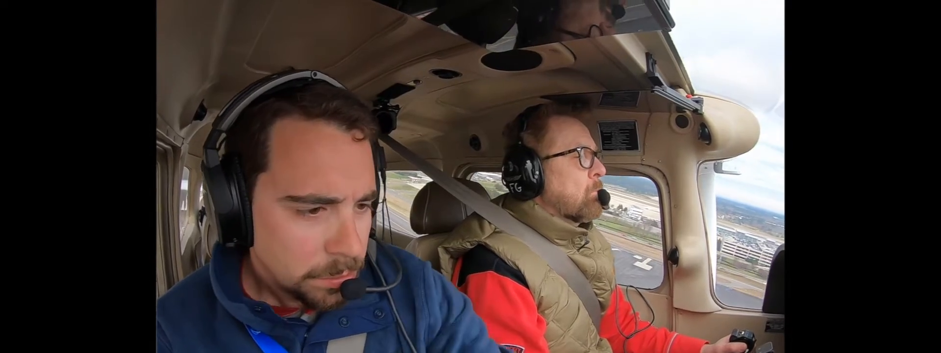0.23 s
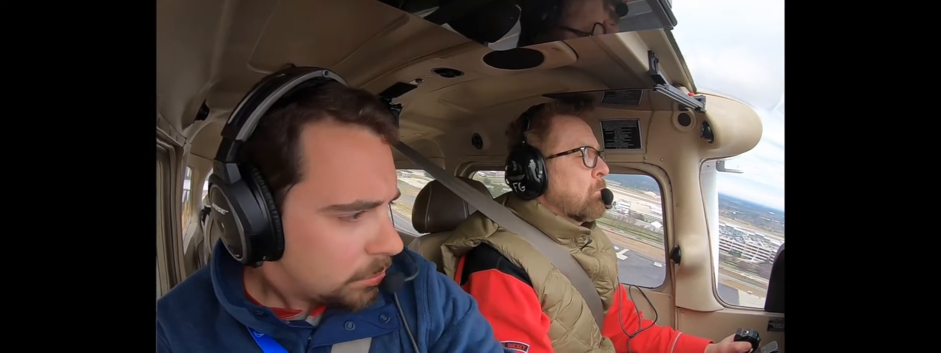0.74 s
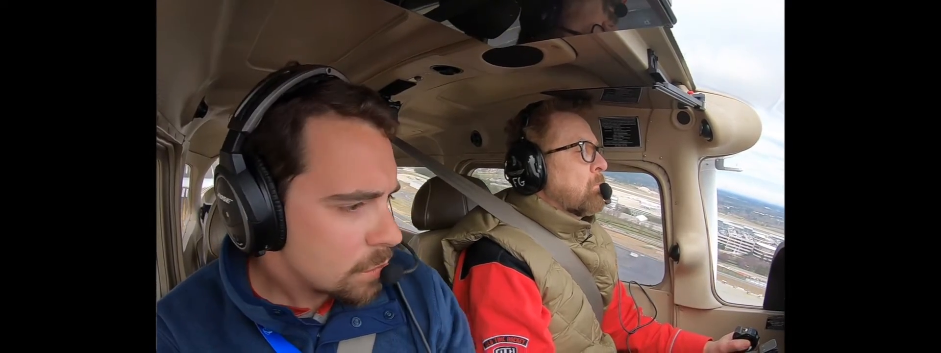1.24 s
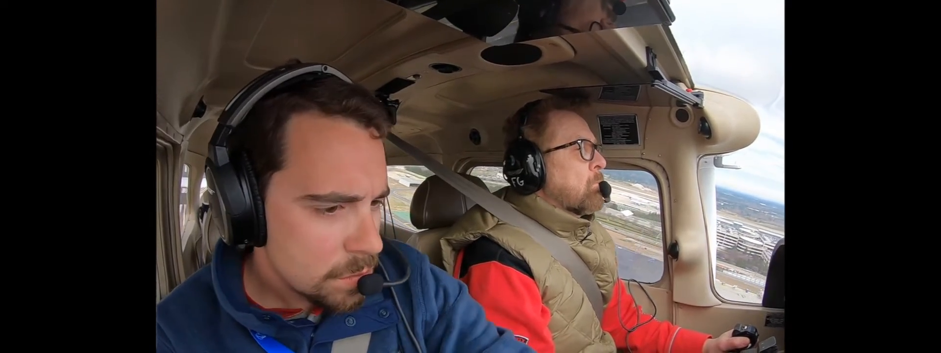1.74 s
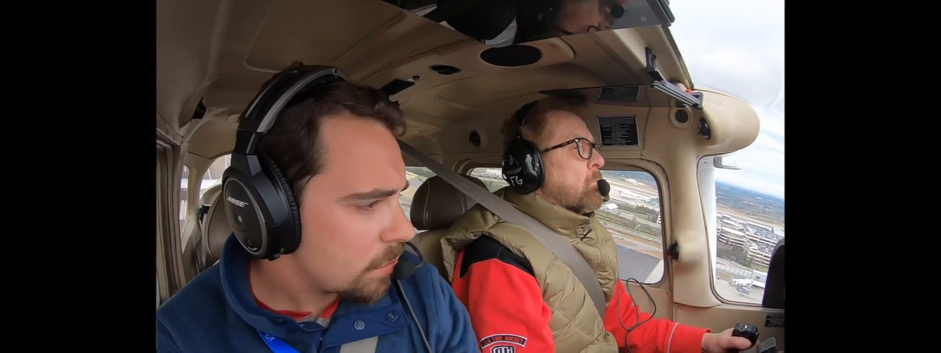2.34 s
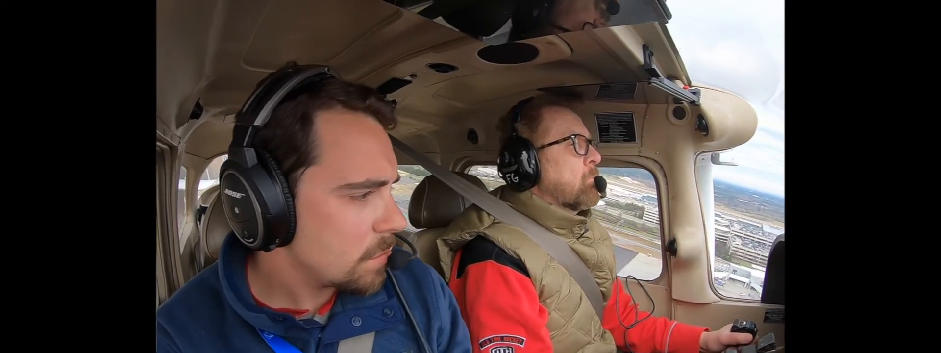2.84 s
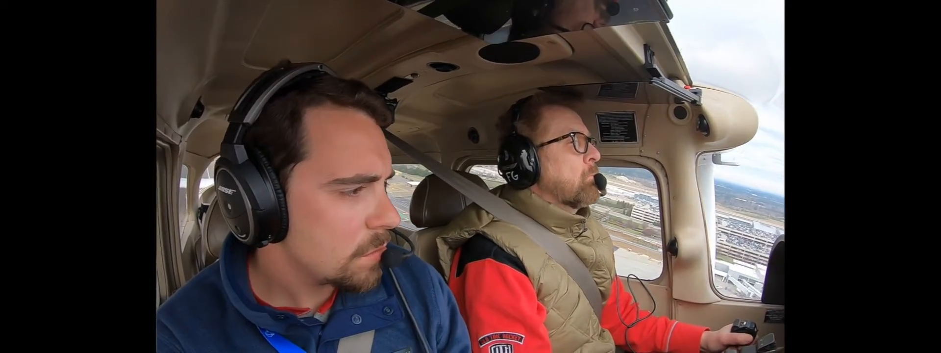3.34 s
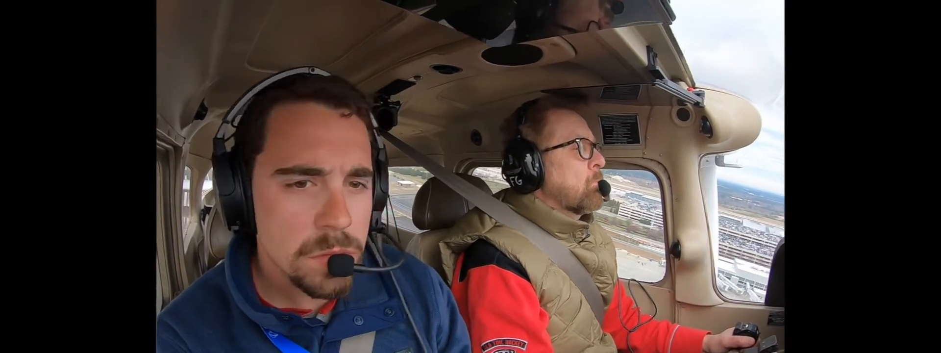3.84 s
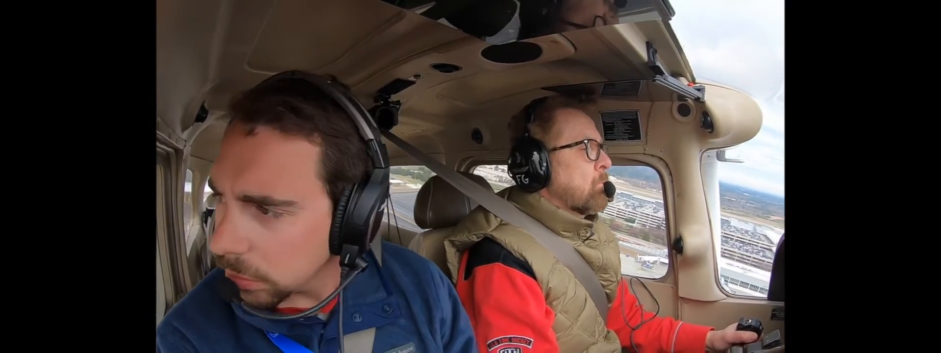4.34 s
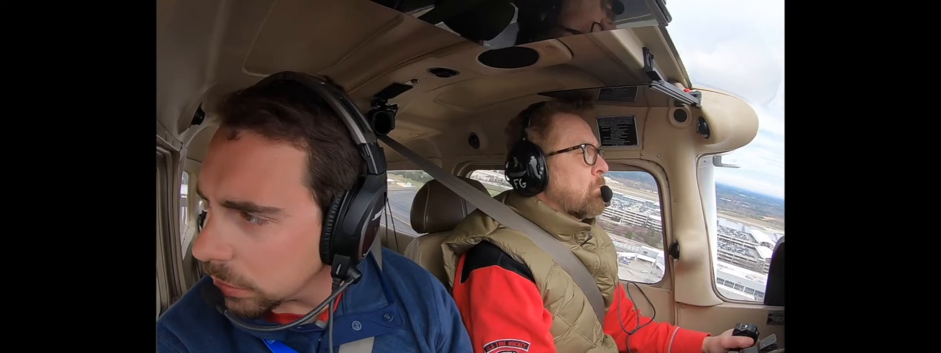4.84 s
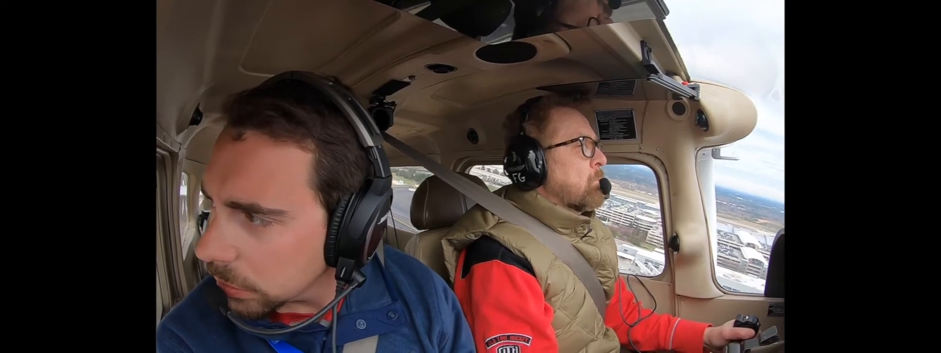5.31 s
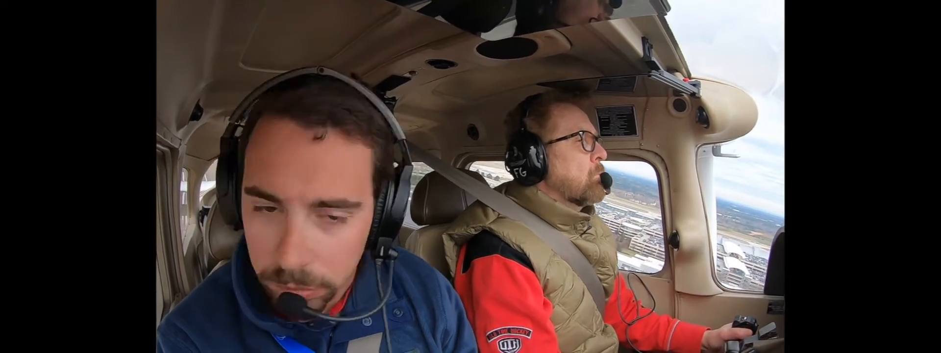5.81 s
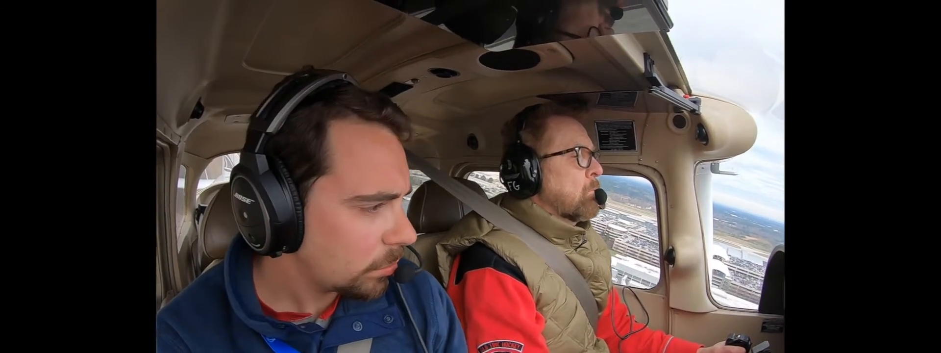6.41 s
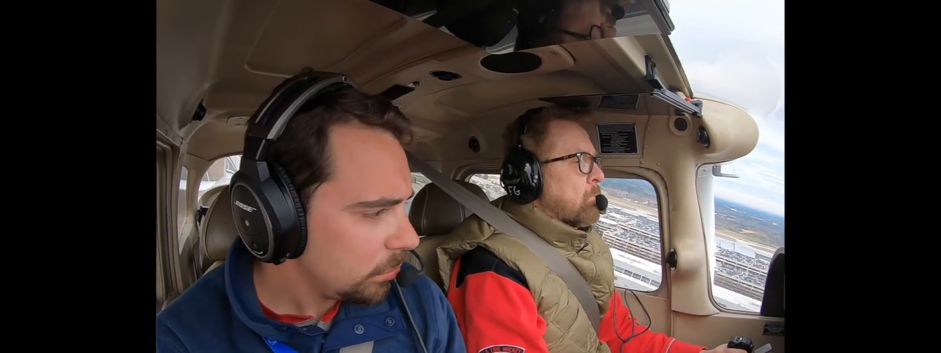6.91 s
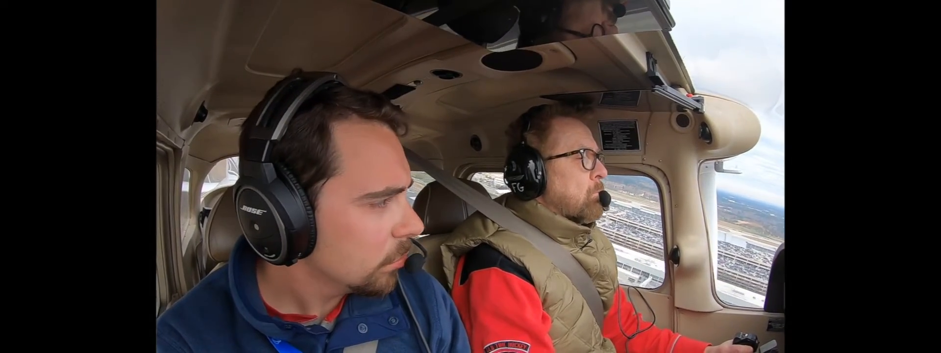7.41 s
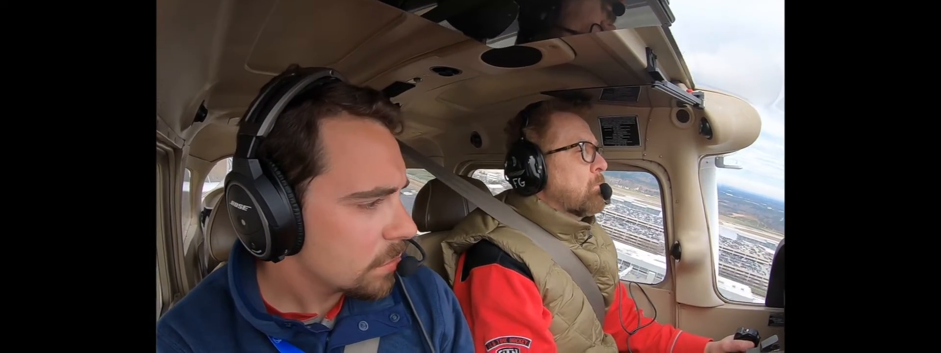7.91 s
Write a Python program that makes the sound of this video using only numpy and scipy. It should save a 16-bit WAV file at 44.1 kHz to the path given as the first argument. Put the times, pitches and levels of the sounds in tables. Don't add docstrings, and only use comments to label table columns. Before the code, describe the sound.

Constant low piston-engine and propeller drone in a light aircraft cabin, muffled at first, one sharp knock, later a run of soft thuds.

```python
import sys
import numpy as np
from scipy import signal
from scipy.io import wavfile
from scipy.ndimage import uniform_filter1d

SR = 44100
rng = np.random.default_rng(int(sys.argv[2]) if len(sys.argv) > 2 else 0)


def inscribe(sig):
    pcm = np.round(np.clip(np.atleast_2d(sig).T, -1, 1) * 32767)
    wavfile.write(sys.argv[1], SR, pcm.astype(np.int16))


def volts_from_decibels(level):
    exponent = np.asarray(level, float) / 20
    return 10 ** exponent


N = 359805

# (time [s], rate [Hz])
FIRING_RATE = [(0.0, 82.31), (0.6, 82.31), (2.0, 82.64), (3.6, 82.52), (4.4, 82.54), (4.8, 82.65),
               (5.2, 82.59), (6.5, 82.24), (7.2, 82.35), (8.16, 82.41)]
# (time [s], nose-up [-2..2])
NOSE_UP = [(0.0, -2), (0.8, -1.45), (1.0, 0.58), (1.2, 1.2), (1.9, 0.7), (2.6, 1.53), (3.2, -0.63),
           (3.5, 0.95), (3.8, 0.9), (4.2, 0), (4.5, 1.4), (5.5, -0.2), (5.6, -1.7), (6.3, -0.6),
           (6.5, -1.65), (7.2, -0.4), (7.8, 0.66), (8.16, 0.93)]
# (time [s], stereo share [0-1])
OPENING = [
    (0, 0.04),
    (.5, 0.1),
    (1, 0.18),
    (1.5, 0.4),
    (2, 0.68),
    (2.3, 0.91),
    (8.16, 1),
]
# (frequency [Hz], level [dB per Hz])
PORT_DIFFERENCE = [(20, -88), (80, -75), (180, -60), (300, -70), (500, -72), (750, -65), (3200, -81.5),
                   (3750, -86), (3900, -130), (5550, -130), (5700, -87), (8000, -84), (12000, -85.5),
                   (15500, -91)]
WHINE_RATIO = 9.817


def read(points, hz):
    f, value = np.transpose(points)
    return np.interp(np.log(hz + 1), np.log(f + 1), value)


def curves(rows, t):
    s, *columns = np.transpose(rows)
    return np.array([np.interp(t, s, column) for column in columns])


def evened(x):
    return x / np.sqrt(np.mean(x ** 2) + 1e-20)


def waver(t, top_hz):
    knots = np.arange(0, N + 512, 512) / SR
    hz = np.geomspace(.1, top_hz, 24)[:, None]
    sines = np.sin(2 * np.pi * (hz * knots + rng.random((24, 1))))
    slow = (sines / hz ** 0.17).sum(0)
    return np.interp(t, knots, evened(slow))


def tone(turns, db, lead=0.98):
    return np.sqrt(2) * volts_from_decibels(db) * np.cos(2 * np.pi * turns + lead)


def engine(turns):
    # (level [dB rms], per nose-up [1], per sideslip [1], per bank [1])
    multiples = [(-15, -0.073, 0.046, 0.048), (-21.5, 0.22, -0.13, 0.011), (-23.5, -0.37, 0.11, -0.11),
                 (-29.5, 0.34, -0.046, -0.063), (-24.5, 0.4, 0.26, -0.0095), (-36, 0.041, -0.054, -0.29),
                 (-41.4, -0.46, 0.001, 0.1), (-34, -0.14, -0.037, 0.19), (-41, -0.033, 0.098, 0.17),
                 (-39, -0.071, 0.05, 0.16), (-52.5, 0.021, -0.04, 0.26), (-51.5, 0.37, 0.151, -0.149),
                 (-51.5, -0.092, 0.062, 0.025), (-60, -0.12, 0.0046, -0.059), (-48, 0.17, -0.014, 0.075)]
    # (multiple of firing rate [1], level [dB rms])
    uneven = [(0.5, -37), (1.25, -39), (1.5, -38), (1.75, -36), (2.25, -39), (2.75, -42), (3.25, -44),
              (4.25, -48), (4.5, -44), (4.75, -45), (5.5, -39), (5.75, -45), (6.25, -45), (6.75, -45),
              (7.25, -49), (7.75, -57), (8.25, -51), (8.5, -51), (8.75, -51), (9.25, -46), (9.5, -51),
              (9.75, -46), (10.5, -56), (10.75, -55), (11.25, -54), (11.5, -51), (12.25, -56)]
    # (time [s], sideslip [-3..3])
    sideslip = [(0.0, 0.2), (0.7, -0.1), (1.5, 1.25), (1.7, -0.3), (2.0, 0.9), (2.3, -1.8), (2.9, 2.1),
                (3.5, 1.7), (4.4, -2.68), (5.4, 0.6), (5.6, -1.05), (6.5, 0.7), (7.3, -0.59), (8.16, 1.83)]
    # (time [s], bank [-3..3])
    bank = [(0.0, -1.3), (1.0, -0.2), (1.2, -2.5), (1.4, 1.9), (2.3, -0.94), (4.1, 0.8), (4.6, -1.5),
            (5.1, 2.3), (5.8, -0.97), (6.1, 1), (6.6, -1.04), (7.1, 3), (7.6, -0.5), (8.16, -0.7)]
    step = 8
    turns = turns[::step]
    t = np.arange(len(turns)) * step / SR
    attitude = np.vstack([curves(c, t) for c in (NOSE_UP, sideslip, bank)])
    drone = 0
    for k, (db, *gained) in enumerate(multiples, start=1):
        sign = -1 if k % 5 == 0 else 1
        drift = 0.0063 * k * waver(t, top_hz=20)
        flutter_db = 0.17 * k * waver(t, top_hz=27.87)
        share = np.maximum(1 + gained @ attitude, .08)
        drone += sign * share * tone(k * turns + drift, db + flutter_db)
    for k, db in uneven:
        waver_db = 2.0 * waver(t, top_hz=5)
        drone += tone(k * turns + rng.random(), db - 1.2 + waver_db)
    return signal.resample_poly(drone, step, 1)[:N]


def alternator(t, turns, opening):
    # (frequency [Hz], level [dB rms])
    whine = [(800, -42.5), (1620, -50), (2430, -56.5), (3240, -59), (4050, -56.5), (4900, -75), (6500, -63),
             (7300, -68), (8900, -60.5), (10500, -63), (11300, -63), (13000, -66), (15400, -79)]
    centre, wide = 0, 0
    for k in range(1, 20):
        hz = k * WHINE_RATIO * FIRING_RATE[0][1]
        db = read(whine, hz) + 1.6 * waver(t, top_hz=3)
        line = tone(k * WHINE_RATIO * turns + rng.random(), db)
        centre += line * unmuffled(hz, opening) ** 3.5
        differs = read(PORT_DIFFERENCE, hz) > -110
        wide += line * rng.uniform(-1, 1) * differs * min(k / 3, 1)
    return centre + np.outer([1, -1], 0.33 * opening * wide)


def unmuffled(hz, opening):
    # (frequency [Hz], gain [dB])
    muffle = [(500, 0.5), (1000, -1), (2000, -2), (3200, -6.5), (4600, -0.5), (6700, -4.5), (9500, -15),
              (13000, -10.5)]
    return opening + (1 - opening) * volts_from_decibels(read(muffle, hz))


def airflow():
    # (frequency [Hz], level [dB per Hz])
    boom_spectrum = [(12, -69), (28, -57), (40, -43.5), (62, -47.5), (110, -46), (200, -48), (290, -47),
                     (430, -52), (520, -51.5), (600, -60), (800, -59), (1150, -62.5), (1700, -76.5),
                     (4000, -130)]
    # (frequency [Hz], level [dB per Hz])
    hiss_spectrum = [(900, -106), (1600, -65), (2000, -69.5), (2450, -70), (2800, -75), (3750, -78),
                     (4400, -68.5), (5500, -71.5), (6600, -79), (7900, -80.5), (10000, -78.5),
                     (11500, -82.5), (13000, -84)]
    # (frequency [Hz], gain [dB])
    capsule = [(13000, 0), (15700, -6)]
    frames = N // 512 + 5
    hz = np.fft.rfftfreq(2048, 1 / SR)[:, None]
    t = np.arange(frames) * 512 / SR
    a, b, c, d, patches = rng.standard_normal((frames, 1025, 5)).T
    patches = uniform_filter1d(patches, size=14, axis=0)
    patches = evened(uniform_filter1d(patches, size=10, axis=1))
    opening = curves(OPENING, t)[0]
    buffet_db, swell_db, hiss_db = gusts(t)
    low = 1 / (1 + (hz / 60) ** 4)
    boom = volts_from_decibels(read(boom_spectrum, hz) + low * buffet_db + (0.5 - low) * swell_db)
    hiss = volts_from_decibels(read(hiss_spectrum, hz) + 0.53 * hiss_db + read(capsule, hz))
    centre = np.hypot(boom, hiss) * unmuffled(hz, opening) * (a + 1j * b)
    wide = volts_from_decibels(read(PORT_DIFFERENCE, hz)) * opening * (c + 1j * d)
    per_hz = np.sqrt(SR / 2048 * 2)
    z = np.array([centre + wide, centre - wide]) * volts_from_decibels(0.39 * patches) * per_hz / 2
    return signal.istft(z, nperseg=2048, noverlap=1536)[1][:, :N]


def gusts(t):
    nose = curves(NOSE_UP, t)[0]
    buffet_db = -.1 - 1.7 * nose + .6 * waver(t, top_hz=2.8)
    swell_db = 3.5 + 1.1 * nose + 0.1 * waver(t, top_hz=2.5)
    hiss_db = 0.8 - 0.9 * np.maximum(t - 4.6, 0)
    return buffet_db, swell_db, hiss_db


def mount():
    # (time [s], snap height [1], push height [1], left share of snap [1], left share of push [1])
    knocks = [
        (0.3966, 0.39, .02, -.2, .9),
        (0.401, 0.85, 0.32, -0.14, .25),
        (1.788, .01, .2, .1, 0.87),
        (1.848, .05, 0.24, .1, 0.73),
        (1.910, .06, 0.33, .1, 0.68),
        (1.970, .06, 0.34, .1, .75),
        (2.030, 0.065, 0.43, .1, .75),
        (2.09, .02, 0.46, .1, .75),
    ]
    t = np.arange(2600) / SR
    out = np.zeros((2, N))
    snap = np.exp(-((t - .003) / 0.00058) ** 2)
    u = np.maximum(t - .0035, 0) / 0.002
    suction = -np.e * u * np.exp(-u)
    rebound = 0.15 * (u / 5) * np.exp(1 - u / 5)
    push = suction + rebound
    for s, snap_size, push_size, snap_left, push_left in knocks:
        at = round((s - .003) * SR)
        knock = np.outer([snap_left, 1], snap_size * snap)
        knock += np.outer([push_left, 1], push_size * push)
        out[:, at:at + len(t)] += knock
    return out


def circuit(t, opening):
    # (frequency [Hz], level [dB rms])
    clocks = [(7812.5, -50), (15625, -77)]
    lines = sum(tone(hz * t, db + 0.5 * waver(t, top_hz=3.7)) for hz, db in clocks)
    return lines * (.18 + .82 * opening) * volts_from_decibels(np.array([[.8], [-.8]]))


def scene():
    t = np.arange(N) / SR
    turns = np.cumsum(curves(FIRING_RATE, t)[0]) / SR
    opening = curves(OPENING, t)[0]
    drone = engine(turns)
    crosswise = signal.iirpeak(215, 1.8, SR)
    ringing = signal.lfilter(*crosswise, signal.lfilter(*crosswise, drone))
    across = np.outer([1, -1], 0.028 * opening * ringing)
    electric = alternator(t, turns, opening) + circuit(t, opening)
    return drone + across + electric + airflow() + mount()


def top_cut(x):
    return signal.sosfilt(signal.butter(12, 15690, fs=SR, output="sos"), x)


def record(dry):
    over = np.maximum(abs(dry) - .56, 0)
    rounded = dry - np.sign(dry) * (over - .25 * np.tanh(over / .25))
    return top_cut(rounded - .002)


dry = scene()
out = record(dry)
inscribe(out)
```